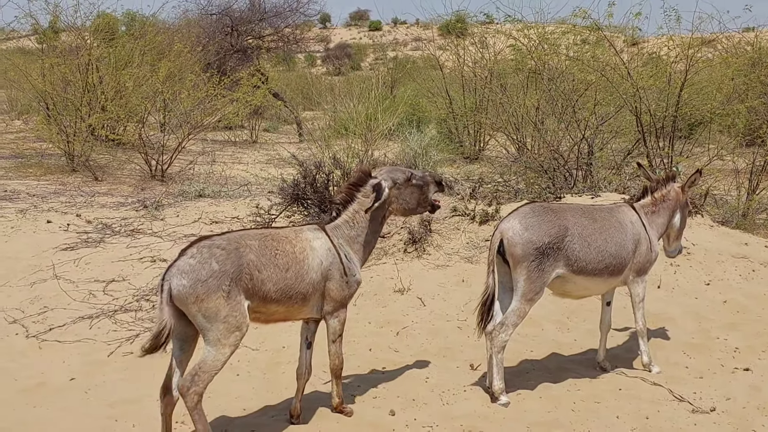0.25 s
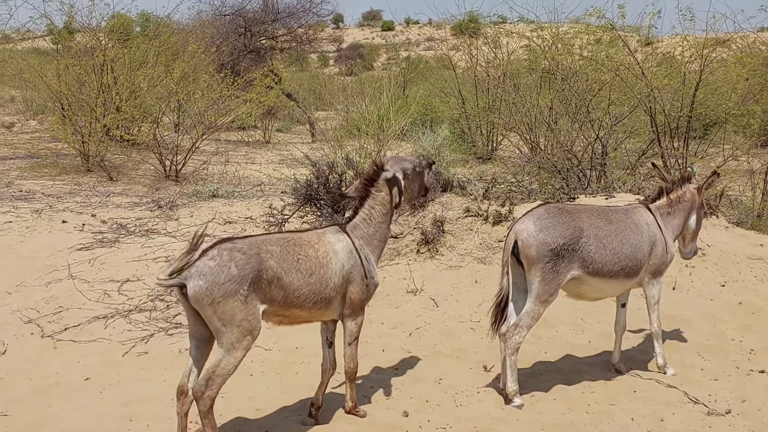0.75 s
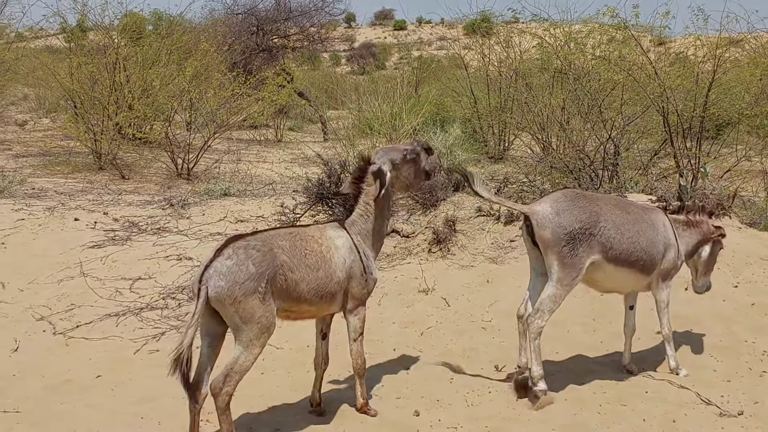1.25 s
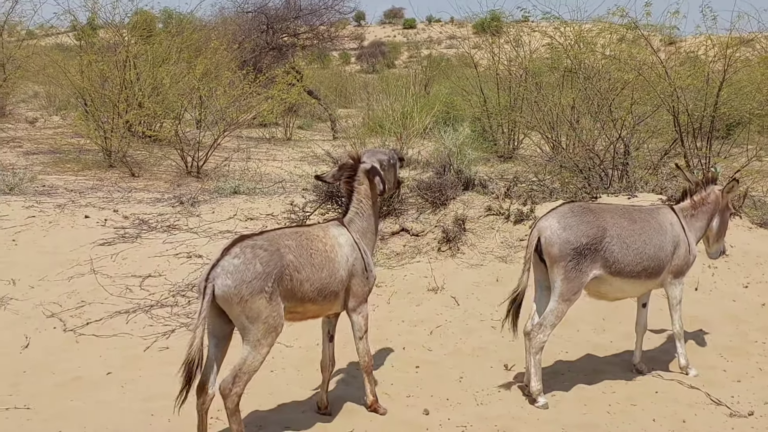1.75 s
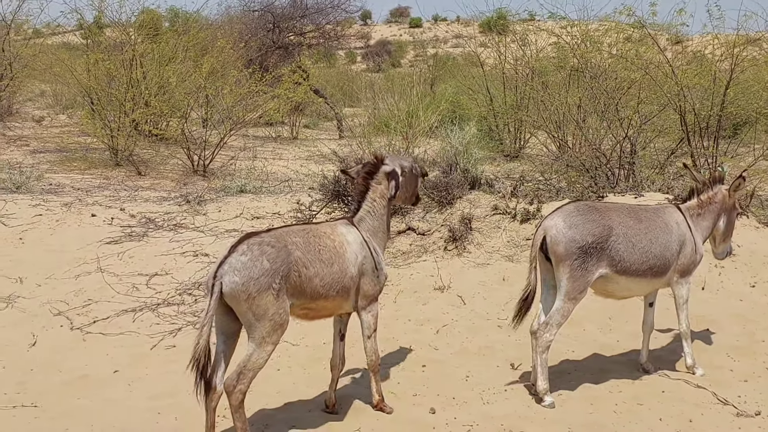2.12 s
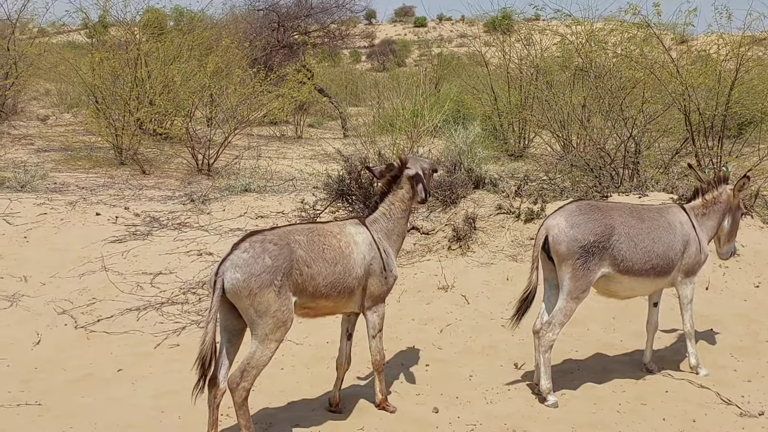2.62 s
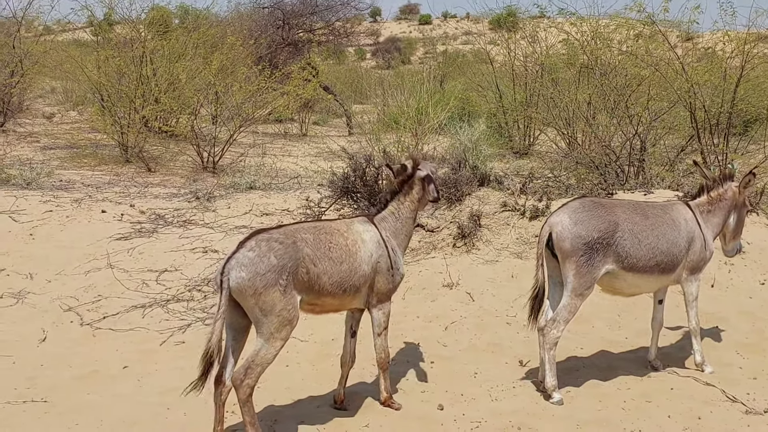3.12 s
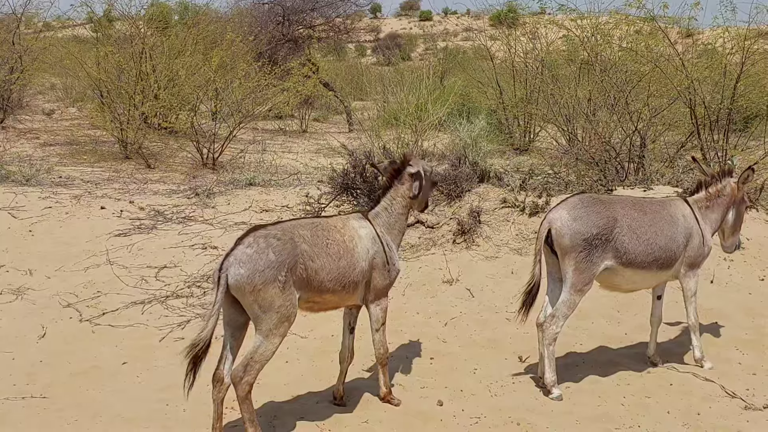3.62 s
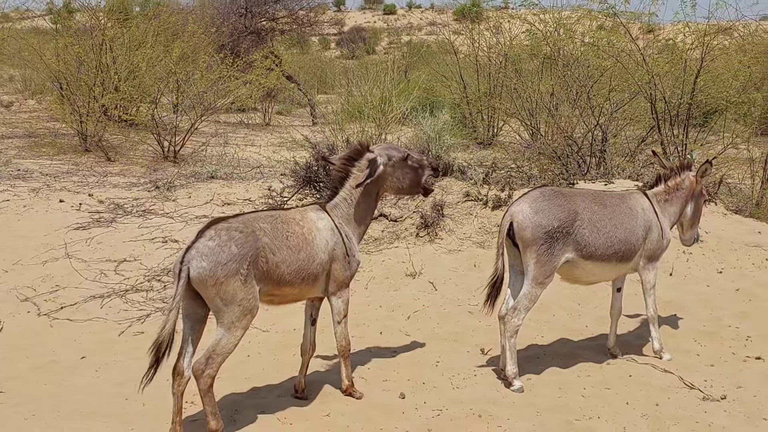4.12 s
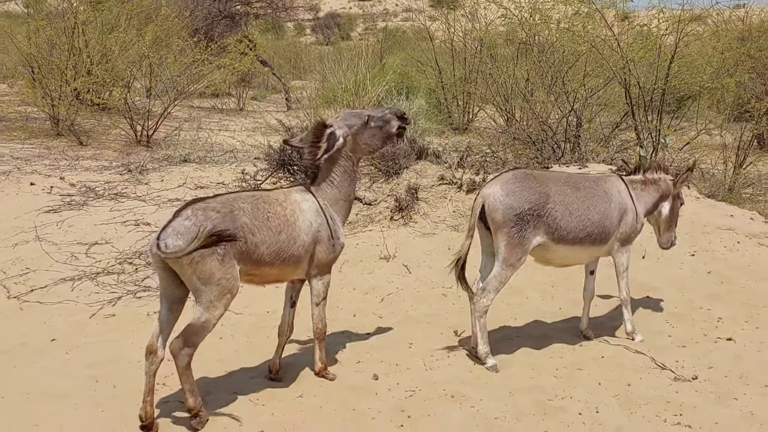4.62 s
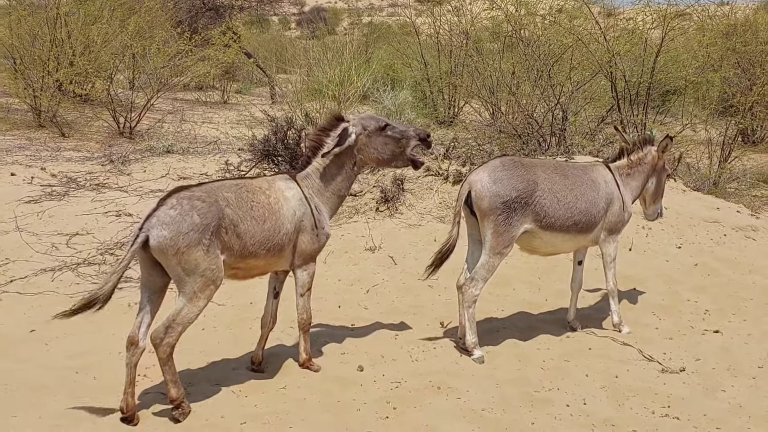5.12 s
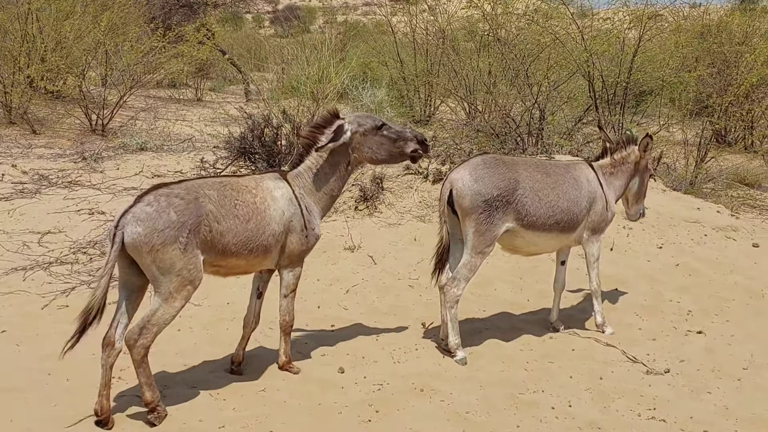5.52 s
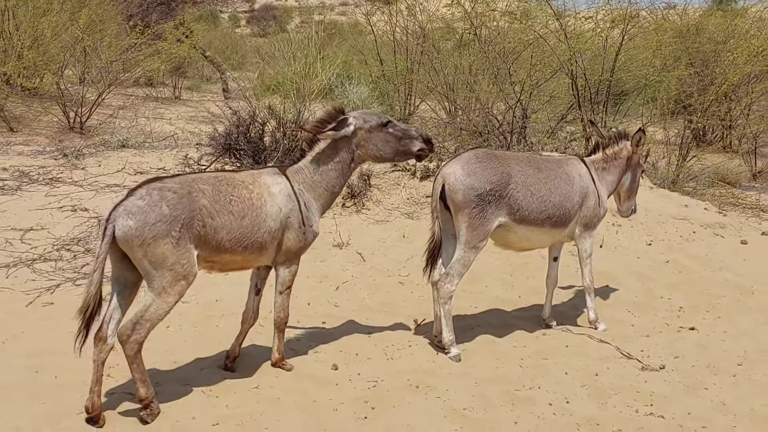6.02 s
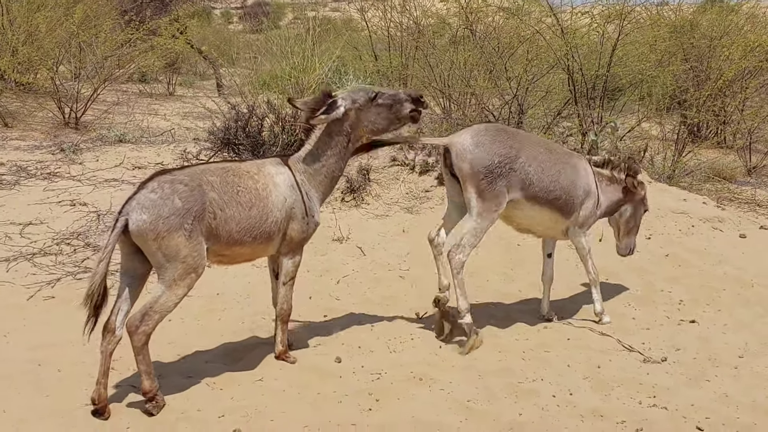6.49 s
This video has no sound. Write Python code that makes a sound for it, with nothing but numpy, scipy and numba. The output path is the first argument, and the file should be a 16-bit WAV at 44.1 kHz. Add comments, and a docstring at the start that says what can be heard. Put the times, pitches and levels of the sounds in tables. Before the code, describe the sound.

Loud rasping donkey bray in open sandy scrub, seven haw-and-hee rounds with shrill squeals, ending in growls and a small hoof thud.

```python
"""A donkey brays in open, sandy scrub, over gusty wind on the microphone and a soft breeze in the twigs.
It opens on a haw: fold pulses, rasping or locked on a clear note, ring the chest, mouth and upper throat.
Hees answer: a hoarse yelp thins into rasping air and, on all but the short first one, a shrill whistle.
Seven rounds of haw and hee follow one another; the last two haws break off into growls.
At the end a hoof lands in sand: a short burst of coloured, gritty noise."""
import sys
import numpy as np
from scipy import signal
from scipy.fft import rfft, irfft
from scipy.io import wavfile
from scipy.ndimage import uniform_filter1d
from numba import njit

SR = 44100
rng = np.random.default_rng(int(sys.argv[2]) if len(sys.argv) > 2 else 0)


def persist_wave(psi):
    """Save psi, clipped to +-1, as 16-bit WAV."""
    counts = np.round(np.clip(psi, -1, 1) * 32767).astype(np.int16)
    wavfile.write(sys.argv[1], SR, np.atleast_2d(counts).T)


N = 297675
TIME = np.arange(N) / SR  # seconds


def undb(db):
    """Decibels to gain."""
    return 10 ** (np.asarray(db) / 20)


def unit(x):
    """Scale to rms 1."""
    return x / np.sqrt(np.mean(x ** 2))


def steady(x):
    """Hold the short-term rms near 1, keeping the single pulses."""
    size = int(.04 * SR)
    power = uniform_filter1d(uniform_filter1d(x ** 2, size), size)
    return x / np.sqrt(np.abs(power) + 1e-18)


def curves(rows):
    """Every column of a table, joined by straight lines in time."""
    s, *columns = np.transpose(rows)
    return [np.interp(TIME, s, c) for c in columns]


def blend(a, b, share):
    """Go from a to b as the share goes from 0 to 1."""
    return a + (b - a) * np.clip(share, 0, 1)


def ramp(s, length):
    """Smooth rise from 0 to 1 over the given length."""
    return np.sin(np.pi / 2 * np.clip(s / length, 0, 1)) ** 2


def slew(gain):
    """Let a gain move no faster than the throat can."""
    return uniform_filter1d(gain, int(.008 * SR))


def calls(table):
    """Time since the start and until the end of the latest call, then its other columns."""
    rows = np.array(table, float)
    # a new call cuts off the one before
    latest = np.maximum(np.searchsorted(rows[:, 0], TIME, "right") - 1, 0)
    start, end, *columns = rows[latest].T
    return [TIME - start, end - TIME] + columns


def progress(age, left):
    """Share of the call that has passed."""
    return np.clip(age / (age + left), 0, 1)


def colour(x, points):
    """Causal minimum-phase filter with the given (Hz, dB) outline."""
    size = 4096
    hz, db = np.transpose(points)
    grid = np.log(np.maximum(np.fft.rfftfreq(size, 1 / SR), 1))
    cepstrum = irfft(np.log(undb(np.interp(grid, np.log(hz), db))))
    # folding the cepstrum forward in time makes the filter causal
    cepstrum[1:size // 2] *= 2
    cepstrum[size // 2 + 1:] = 0
    return signal.fftconvolve(x, irfft(np.exp(rfft(cepstrum))))[:N]


def cut(x, hz, kind, order=6):
    """Butterworth low-pass or high-pass."""
    return signal.sosfilt(signal.butter(order, hz, kind, fs=SR, output="sos"), x)


def noise():
    """White noise."""
    return rng.standard_normal(N)


def wobble(hz):
    """Random motion up to the given rate, spread 1."""
    return unit(cut(noise(), hz, "low", order=2))


@njit
def resonance(x, hz, width):
    """State-variable band-pass with moving centre and width."""
    y, band, low = np.empty(len(x)), 0., 0.
    for i in range(len(x)):
        g, k = np.tan(np.pi * hz[i] / SR), width[i] / hz[i]
        v = (band + g * (x[i] - low)) / (1 + g * (g + k))
        band, low, y[i] = 2 * v - band, low + 2 * g * v, k * v
    return y


@njit
def slaps(hz, jitter, shimmer, chance):
    """One pulse at each closing of the folds; every cycle has its own length and force."""
    pulses, phase = np.zeros(len(hz) + 1), np.empty(len(hz))
    p, k = 0., 0
    for i in range(len(hz)):
        step = hz[i] * np.exp(jitter[i] * chance[k, 0]) / SR
        p += step
        if p >= 1:
            p, k = p - 1, k + 1
            force = np.exp(shimmer[i] * chance[k, 1]) / np.sqrt(hz[i] / SR)
            # share the pulse between two samples, to place it between them
            pulses[i] += force * p / step
            pulses[i + 1] += force * (1 - p / step)
        phase[i] = p
    return pulses[:-1], phase


def folds(hz, rough, flap_hz, depth, jitter, shimmer, air):
    """Pitch, pulse train and air puffs of the folds; roughness unsettles them and lets the palate flap."""
    rough = np.clip(rough, 0, 1)
    # unsettled folds lurch between pitches
    hz = hz * np.exp(.09 * rough * wobble(45))
    chance = rng.standard_normal((N // 20, 2))
    pulses, phase = slaps(hz, jitter * rough ** 1.4, shimmer * rough, chance)
    puffs = unit(np.exp(-phase / 3.5) * noise())
    unsteady_flap_hz = flap_hz * (1 + 0.3074 * wobble(40.3))
    swing = np.cos(2 * np.pi * np.cumsum(unsteady_flap_hz) / SR)
    # a deep flap chops the voice into separate bursts
    flap = np.exp(3 * np.clip(depth, 0, 1) ** 2 * rough * swing)
    return hz, flap * (pulses + air * rough * puffs), flap * puffs


# Narrow resonances of the upper throat. Each row: centre in Hz, width in Hz, strength in dB;
# centre and strength waver about these.
UPPER_THROAT = [(2850, 87, 3), (3318, 140, 11), (4026, 550, 4.5), (4890, 150, -1)]


def upper_throat(x, direct):
    """Narrow high resonances that slide as the throat strains, over a share of direct sound."""
    stretch = 1 + .025 * wobble(9.8)
    out = direct * x
    for hz, width, db in UPPER_THROAT:
        flicker = undb(db + 3.5 * wobble(7.6))
        out = out + flicker * resonance(x, hz * stretch, np.full(N, float(width)))
    return out


# Outward calls; the last two haws break off into growls, on rows of their own.
# Each row: start, end and attack in seconds, level in dB, level change over the call in dB,
# swell midway in dB, chest against level in dB, upper throat against level in dB, mouth resonance in Hz
# midway, first and last pitch in Hz before sag and lurches, roughness 0-1,
# average palate flaps per second, flap depth 0-1.
HAWS = [(0, .234, 0.0013, -23.5, -4.5, 0.4, -5.5, -2, 930, 457.4, 457.8, .08, 70, 0.9),
        (1.25, 1.70, 0.022, -20.5, -5, -2, -4, -2.5, 1100, 414.5, 220.3, .48, 70, 0.5),
        (2.187, 2.575, 0.02, -22.5, -8, 3.5, -8.5, -5, 818, 258.2, 478.3, .56, 70, 0.2),
        (3.035, 3.228, 0.013, -26.5, 2, 3.5, -4.5, -5.5, 873, 245.3, 339, 0.71, 70, 0.1),
        (3.62, 3.762, .028, -24.5, 11, -2.5, -3, -7.5, 884, 139.9, 331.1, .42, 70, 0.6),
        (4.121, 4.425, 0.054, -13, -23, 2, -13.5, -10.5, 1088, 321, 194.8, 0.71, 47, 0.1),
        (4.40, 4.97, 0.0052, -48, 0.5, 1.5, -0.5, -18.5, 650, 197.9, 265.5, .8, 45, 0.5),
        (5.388, 5.68, 0.1, -16.5, -32.5, 6, -10, -15.5, 639, 272.2, 213.7, .7, 44, 0.55),
        (5.615, 6.12, 0.0055, -46, -21, 17.5, 1, -31, 663, 225.7, 308.1, .4, 36, 0.78)]
# Where the folds lock on a clear note. Each row: start and end in seconds, pitch in Hz before sag,
# then the change of mouth level, of chest and of upper throat in dB.
CLEAR_NOTES = [(1.375, 1.495, 329, 2.5, 4, 1), (1.497, 1.72, 750.7, -0.5, -18, -16.5),
               (2.368, 2.6, 444.8, 5, -1, -0.5), (3.178, 3.25, 425.4, 0, -6.5, 5.5)]
LOCK_S, CLEAR_ROUGH = .02, .1
MOUTH_HZ = 900  # on a clear note the mouth tunes to the harmonic nearest this
MOUTH_CLOSING = 0.24  # share by which the mouth resonance sinks over a haw
HAW_RELEASE_S = 0.043
# as a haw runs out of air, its pitch sags by a share and chest and upper throat fade first
SPENT_S, SPENT_SAG, SPENT_CHEST_DB, SPENT_UPPER_DB = .045, .12, -15.5, -11
# rough haws lurch in strength and the mouth resonance wanders by a share; both scale with roughness
HAW_LURCH_DB, HAW_LURCH_HZ, MOUTH_WANDER = 2, 27, .05


def haw_gestures():
    """Each haw glides in pitch and level, may lock on a clear note, and sags as its air runs out."""
    (age, left, attack, db, change_db, swell_db, chest_db, upper_db,
     mouth_hz, first_hz, last_hz, rough, flap_hz, depth) = calls(HAWS)
    note_age, note_left, note_hz, note_db, note_chest_db, note_upper_db = calls(CLEAR_NOTES)
    along = progress(age, left)
    lock = ramp(note_age, LOCK_S) * ramp(note_left, LOCK_S)
    spent = np.exp(-np.maximum(left, 0) / SPENT_S)
    gate = ramp(age, attack) * ramp(left, HAW_RELEASE_S)

    glide_hz = blend(first_hz, last_hz, along)
    hz = blend(glide_hz, note_hz, lock) * (1 - SPENT_SAG * spent)
    rough = blend(rough, CLEAR_ROUGH, lock)

    closing_hz = mouth_hz * (1 - MOUTH_CLOSING * (along - .5))
    harmonic_hz = note_hz * np.round(MOUTH_HZ / note_hz)
    mouth_hz = blend(closing_hz, harmonic_hz, lock)
    mouth_hz = mouth_hz * np.exp(MOUTH_WANDER * rough * wobble(HAW_LURCH_HZ))

    db = db + change_db * along + swell_db * np.sin(np.pi * along)
    db = db + HAW_LURCH_DB * rough * wobble(HAW_LURCH_HZ)
    chest_db = db + chest_db + lock * note_chest_db + SPENT_CHEST_DB * spent
    upper_db = db + upper_db + lock * note_upper_db + SPENT_UPPER_DB * spent
    return gate, db + lock * note_db, chest_db, upper_db, mouth_hz, (hz, rough, flap_hz, depth)


# Throat and head on the way out. Each row: frequency in Hz, gain in dB.
HAW_THROAT = [(400, -10), (560, 9.5), (850, 12.5), (1300, 6.5), (1500, -8), (1730, 2), (1950, -14),
              (2330, -11.5), (2700, -20.5), (2950, -32), (3700, -32), (5000, -28), (5800, -32), (6900, -50),
              (15000, -60.5)]
# Body of the chest. Each row: frequency in Hz, gain in dB.
CHEST = [(100, -12), (170, -5), (300, -0.5), (400, -4.5), (480, 8.5), (580, -18), (750, -53)]
CLEAR_HISS = 0.98  # share of the air hiss that is left on a fully smooth note


def haws():
    """Outward calls: the folds ring the chest, the mouth and the upper throat resonances."""
    gate, mouth_db, chest_db, upper_db, mouth_hz, tension = haw_gestures()
    rough = tension[1]
    hz, source, puffs = folds(*tension, jitter=.25, shimmer=.4, air=.8)
    throat = colour(source, HAW_THROAT)

    # an open mouth damps its resonance and lets more of the spectrum past; a nearly shut one hums
    opening = np.minimum((mouth_hz / 900) ** 6, 1.3)
    width = 130 + 170 * opening
    ringing = 0.028 * throat + resonance(throat, mouth_hz, width)
    mouth = resonance(ringing, mouth_hz, 1.7 * width)
    mouth = cut((0.007 + 0.65 * opening) * throat + mouth, 1593, "low", order=8)

    # air rushing past the folds hisses even on the clear notes
    hiss = cut(colour(puffs, HAW_THROAT), 2700, "high", order=6)
    hiss = blend(CLEAR_HISS, 1, 2 * rough) * undb(-3) * hiss
    upper = upper_throat(throat + hiss, direct=0.22 + 1.0 * opening)
    upper = cut(upper, 1249, "high", order=8)

    # the chest mostly carries the fundamental
    fundamental = resonance(source, hz, np.full(N, 50.))
    chest = colour(0.28 * source + fundamental, CHEST)

    parts = [(mouth_db, mouth), (chest_db, chest), (upper_db, upper)]
    return sum(slew(gate * undb(db)) * steady(part) for db, part in parts)


# Gusts on the microphone. Each row: time in seconds, gust level in dB before the buffeting trim.
GUSTS = [(0.0, -51.5), (0.3, -74), (1.37, -46.5), (1.71, -61.5), (2.44, -35), (2.99, -52.5), (3.08, -46.5),
         (3.35, -54.5), (4.06, -40.5), (4.12, -56), (4.25, -30), (5.15, -43.5), (5.3, -47.5), (6.13, -37.5),
         (6.17, -48.5), (6.33, -38), (6.49, -49), (6.75, -39)]
# Spectrum of the eddies. Each row: frequency in Hz, gain in dB.
WIND = [(20, -9), (55, 2), (100, -4.5), (170, -6.5), (260, -16), (500, -33), (1500, -62.5), (6000, -82)]
# Thin high sizzle that comes and goes on its own times. Each row: time in seconds, level in dB.
SIZZLE = [(3.9, -69), (4.42, -67), (4.75, -93), (5.07, -57), (6.12, -90), (6.24, -59.5), (6.75, -69.5)]
WIND_DB = 2.5  # buffeting trim: added to the gust level


def wind():
    """Eddies buffet one microphone port; strong gusts are brighter; a separate thin sizzle comes late on."""
    gust_db = curves(GUSTS)[0]
    eddies = unit(cut(colour(noise(), WIND), 24, "high", order=2))
    eddies = eddies * undb(3 * wobble(14))
    slow = cut(eddies, 140, "low", order=2)
    bright_db = np.minimum(.5 * (gust_db + 44.5), 3)
    rumble = slow + undb(bright_db) * cut(eddies, 91, "high", order=1)
    sizzle_db = np.interp(TIME, *np.transpose(SIZZLE), left=-110)
    sizzle = unit(cut(noise(), 10500, "high", order=3))
    return undb(gust_db + WIND_DB) * rumble + undb(sizzle_db) * sizzle


# Breeze hissing in the bushes. Each row: time in seconds, level in dB.
BREEZE = [(.7, -89), (1.7, -66.5), (3.25, -58), (4.6, -57.5), (6.75, -62)]
# Spectrum of the twigs. Each row: frequency in Hz, gain in dB.
TWIGS = [(400, -7.5), (1000, -3), (2100, -6.5), (3000, -6.5), (5500, -8.5), (7000, -28.5), (15000, -31)]


def breeze():
    """Twigs hiss softly as the breeze rises: coloured noise with a slightly wavering level."""
    level_db = curves(BREEZE)[0] + 1.5 * wobble(14)
    return undb(level_db) * unit(colour(noise(), TWIGS))


# Spectrum of the open air. Each row: frequency in Hz, relative level in dB.
AIR = [(30, -11), (70, -8.5), (300, -20), (1300, -27), (3000, -29), (15000, -46)]
AIR_DB = -75


def open_air():
    """A very faint, steady bed of coloured noise."""
    return undb(AIR_DB) * unit(colour(noise(), AIR))


# Inward calls. Each row: start, end and yelp length in seconds, yelp pitch in Hz before sag and warble,
# yelp level in dB, rasp level midway in dB, rushing air level midway in dB, closing croak in dB,
# mouth shut 0-1.
HEES = [(.52, .65, 0.12, 460.9, -56.5, -60.5, -57.5, -67.5, 1),
        (.712, 1.235, 0.1, 488.7, -30, -46, -42, -48.5, .2),
        (1.785, 2.175, 0.11, 373.6, -33, -45, -47, -37.5, 0),
        (2.633, 3.02, 0.11, 438.3, -29.5, -42, -48, -41.5, 0),
        (3.289, 3.61, .08, 329.8, -32, -42.5, -47, -69, 0),
        (3.803, 4.09, 0.054, 481.8, -30, -44.5, -46.5, -49.5, 0),
        (4.975, 5.335, .07, 289.2, -31, -46, -43, -36, 0.2),
        (6.137, 6.475, .06, 357.2, -38, -43.5, -41.5, -30, 0.76)]
# Throat and head on the way in. Each row: frequency in Hz, gain in dB.
HEE_THROAT = [(250, -12), (390, -17.5), (490, -4), (610, -3.5), (880, 9), (1120, -6.5), (1350, 1),
              (1600, -8), (2150, -19), (2700, -25), (3500, -30.5), (4400, -27), (5700, -27.5), (6900, -69),
              (15000, -47)]
# Colour of a shut mouth on a hee. Each row: frequency in Hz, gain in dB.
SHUT_MOUTH = [(300, 9), (450, 5), (680, 9), (900, -15), (1200, 1.5), (1550, 10), (1900, 5.5), (3300, 10),
              (4200, 5)]
HEE_ATTACK_S, HEE_RELEASE_S = 0.016, 0.038
HEE_FLAP_HZ, HEE_FLAP_DEPTH = 62, 0.37
YELP_RELEASE_S, YELP_AIR_DB = .04, -16.5  # air against the yelp
YELP_SAG, YELP_WARBLE, YELP_ROUGH = .18, .1, .22  # sag is a share of the pitch
RASP_HZ, RASP_ROUGH = 419.5, .95
RASP_ARCH_DB, AIR_ARCH_DB = 3.5, 14.5  # rasp and air are this much weaker at the ends than midway
CROAK_LEAD_S, CROAK_WIDTH_S = 0.051, 0.037  # the croak peaks this long before the end
CROAK_HZ, CROAK_AIR_DB = 269.7, -25.5  # air against the croak


def hees():
    """Inward calls: a hoarse, falling yelp thins into rasping air as the throat tightens, then croaks."""
    age, left, yelp_s, yelp_hz, yelp_db, rasp_db, air_db, croak_db, shut = calls(HEES)
    gate = ramp(age, HEE_ATTACK_S) * ramp(left, HEE_RELEASE_S)
    yelp = ramp(yelp_s - age, YELP_RELEASE_S)
    croak = np.exp(-((left - CROAK_LEAD_S) / CROAK_WIDTH_S) ** 2)
    off_centre = (2 * progress(age, left) - 1) ** 2

    yelp_hz = yelp_hz * blend(1, 1 - YELP_SAG, age / yelp_s) * np.exp(YELP_WARBLE * wobble(30))
    hz = blend(blend(RASP_HZ, CROAK_HZ, croak), yelp_hz, yelp)
    rough = blend(RASP_ROUGH, YELP_ROUGH, yelp)
    _, source, _ = folds(hz, rough, HEE_FLAP_HZ, HEE_FLAP_DEPTH, jitter=.2, shimmer=.35, air=.9)

    throat = colour(source, HEE_THROAT)
    throat = blend(throat, colour(throat, SHUT_MOUTH), shut)
    mouth = cut(throat, 1900, "low")
    rush = cut(upper_throat(throat, direct=0.083), 1900, "high") * undb(3.1 * wobble(55))

    voice_gain = yelp * undb(yelp_db) + croak * undb(croak_db)
    rasp_gain = undb(rasp_db - RASP_ARCH_DB * off_centre)
    breath_gain = yelp * undb(yelp_db + YELP_AIR_DB) + croak * undb(croak_db + CROAK_AIR_DB)
    air_gain = undb(air_db - AIR_ARCH_DB * off_centre)
    voiced = np.hypot(voice_gain, rasp_gain) * steady(mouth)
    airy = np.hypot(breath_gain, air_gain) * steady(rush)
    return gate * (voiced + airy)


# Whistles within the hees. Each row: start and end in seconds, settled pitch in Hz, loudest moment in
# seconds, peak level in dB, fall after the peak in dB per second, loudest moment of the lower octave
# in seconds, its level in dB, overtones in dB against the tone, unsteadiness 0-1.
WHISTLES = [(.80, 1.18, 5337, .956, -20, 121.5, 1.07, -29, -6, 0.5),
            (1.885, 2.115, 5294, 2.0, -32, 31, 1.99, -32.5, 4.5, 0.22),
            (2.745, 2.965, 5332, 2.885, -31, 110, 2.87, -39, 2, 0.51),
            (3.38, 3.575, 5427, 3.47, -33, 97, 3.44, -33, -2.5, 0.2),
            (3.86, 4.075, 5423, 3.925, -36, 108.5, 3.92, -34, -10, .6),
            (5.05, 5.25, 5433, 5.148, -24, 330, 5.11, -34.5, -10, 0.43),
            (6.20, 6.45, 5390, 6.27, -29, 200, 6.24, -36.5, -8, 0.38)]
WHISTLE_EDGE_S, OCTAVE_FALL_DB_PER_S = 0.024, 113
WHISTLE_OVERSHOOT, WHISTLE_SETTLE_S = .045, .06  # each whistle starts sharp by this share and settles
# the swell has a rounded crest and rises this many times as fast as it falls
WHISTLE_CREST_S, WHISTLE_RISE = .025, 1.4
CLEAN_OCTAVE_DB = -16  # a whistle is pure while its lower octave stays this far under it


def whistle_gestures():
    """Each whistle starts sharp, swells and fades; it is roughest where the lower octave takes over."""
    (age, left, hz, peak_s, db, fall, octave_s, octave_db,
     overtones_db, unsteady) = calls(WHISTLES)
    gate = ramp(age, WHISTLE_EDGE_S) * ramp(left, WHISTLE_EDGE_S)
    hz = hz * (1 + WHISTLE_OVERSHOOT * np.exp(-np.maximum(age, 0) / WHISTLE_SETTLE_S))
    slope = fall * np.where(TIME < peak_s, WHISTLE_RISE, 1)
    from_crest_s = np.hypot(TIME - peak_s, WHISTLE_CREST_S) - WHISTLE_CREST_S
    db = db - slope * from_crest_s
    octave_db = octave_db - OCTAVE_FALL_DB_PER_S * np.abs(TIME - octave_s)
    rough = np.clip(unsteady * (1 - (octave_db - db) / CLEAN_OCTAVE_DB), 0, 1)
    return gate, hz, db, octave_db, overtones_db, rough


# Overtones of the whistle. Each row: multiple of its pitch, level in dB before each whistle's own trim.
WHISTLE_OVERTONES = [(1.5, -38.5), (2, -25), (2.5, -42.5)]


def whistles():
    """The tight throat squeals; when it loses its lock the tone flutters and drops a lower octave."""
    gate, hz, db, octave_db, overtones_db, rough = whistle_gestures()
    phase = 2 * np.pi * np.cumsum(hz * (1 + 0.059 * rough * wobble(180))) / SR

    def partial(multiple, blur, flutter_hz):
        """One line of the whistle, shaken in strength and phase."""
        shake = blur * (wobble(flutter_hz) + 1j * wobble(flutter_hz))
        return steady(np.real((1 - 2.0 * blur + shake) * np.exp(1j * multiple * phase)))

    # tones just below the pitch beat together in the rough stretches
    beating = partial(0.99, 1.1 * rough, 150) + 0.3 * rough * partial(.925, 0.3, 130)
    tone = steady(cut(beating, 6000, "low", order=10))
    overtones = sum(undb(over_db) * partial(k, 0.24 + 0.51 * rough, 160)
                    for k, over_db in WHISTLE_OVERTONES)
    octave = partial(.5, .5 + 0.62 * rough, 150)
    tremble = undb((.7 + 1.8 * rough) * wobble(70))
    squeal = undb(db) * (tone + undb(overtones_db) * overtones)
    return gate * tremble * (squeal + undb(octave_db) * octave)


# Hoof in sand. Each row: start in seconds, level in dB, decay time constant in seconds.
HOOVES = [(6.664, -38, 0.034)]
# Spectrum of the sand. Each row: frequency in Hz, gain in dB.
SAND = [(100, -15), (300, 6.5), (600, -32), (1000, -1.5), (1400, -18.5), (5000, -29), (7000, -38.5),
        (15000, -45)]


def hooves():
    """A hoof sinks into loose sand with a short gritty thud: uneven noise under a fast decay."""
    out = np.zeros(N)
    for s, db, length in HOOVES:
        age = np.maximum(TIME - s, 0)
        grit = unit(colour(noise() * undb(3 * wobble(200)), SAND))
        envelope = (1 - np.exp(-age / 0.0042)) * np.exp(-age / length)
        out += undb(db) * envelope * grit
    return out


def scrub(x, t60, wet_db):
    """Faint scatter from bushes and the sandy bank: a decaying noise response."""
    age = TIME[:SR // 2]
    response = rng.standard_normal(len(age)) * undb(-60 * age / t60) * (age > .004)
    return undb(wet_db) * signal.fftconvolve(x, response / np.linalg.norm(response))[:N]


# Difference between the microphone ports against their sum. Each row: frequency in Hz, level in dB.
PORTS = [(100, -45), (400, 0), (700, -26), (1200, 1), (2500, -1.5), (5300, -1), (9000, 0.5), (15000, 0.5)]
# Left port against right. Each row: frequency in Hz, approximate balance in dB, split between the two.
PORT_BALANCE = [(60, 1), (110, 2), (200, -3.5), (380, -1), (700, 3), (1290, -6), (2380, 4), (4400, -1),
                (8120, -3.5), (15000, -2.5)]


def port_difference(x):
    """What the left port gains and the right one loses: a phase lead and a tilt in level."""
    grid_hz = np.fft.rfftfreq(N, 1 / SR)
    hz, db = np.transpose(PORTS)
    lead = 1j * undb(np.interp(grid_hz, hz, db))
    hz, db = np.transpose(PORT_BALANCE)
    lean = undb(np.interp(grid_hz, hz, db) / 2) - 1
    return irfft(rfft(x) * (lead + lean), N)


FAR_T60_S, FAR_DB = 0.24, -6.5  # the far bushes keep the whistle ringing


def scene():
    """The donkey leads in phase at the left port; wind, breeze, air and scatter differ at each."""
    donkey = haws() + hees() + whistles() + hooves()
    side = port_difference(donkey)
    treble = cut(donkey, 2200, "high", order=2)
    ports = []
    for sign in (1, -1):  # left, right
        near = scrub(treble, t60=.04, wet_db=-12)
        far = scrub(treble, FAR_T60_S, FAR_DB)
        full_range = scrub(donkey, t60=0.063, wet_db=-12.0)
        scatter = near + far + full_range
        ports.append(donkey + sign * side + scatter + wind() + breeze() + open_air())
    return np.array(ports)


TOP_HZ = 15700


def record(dry):
    """The recorder cuts the top with a steep elliptic low-pass."""
    return signal.sosfilt(signal.ellip(10, .2, 80, TOP_HZ, fs=SR, output="sos"), dry)


dry = scene()
out = record(dry)
persist_wave(out)
```